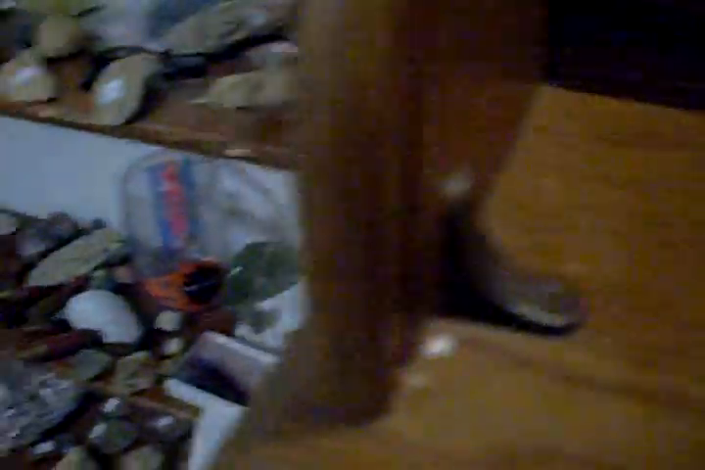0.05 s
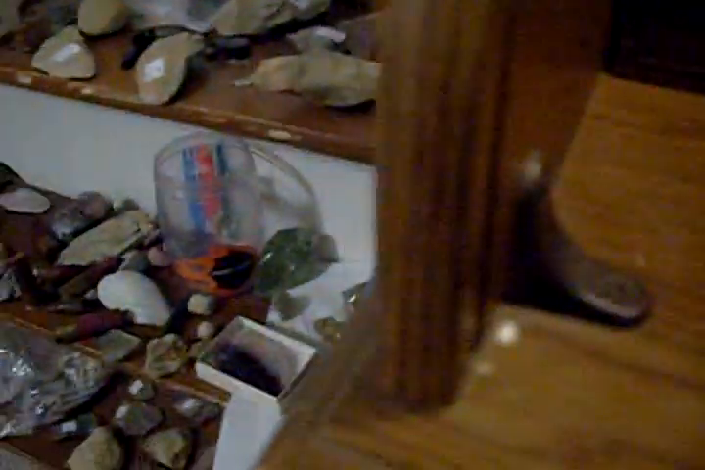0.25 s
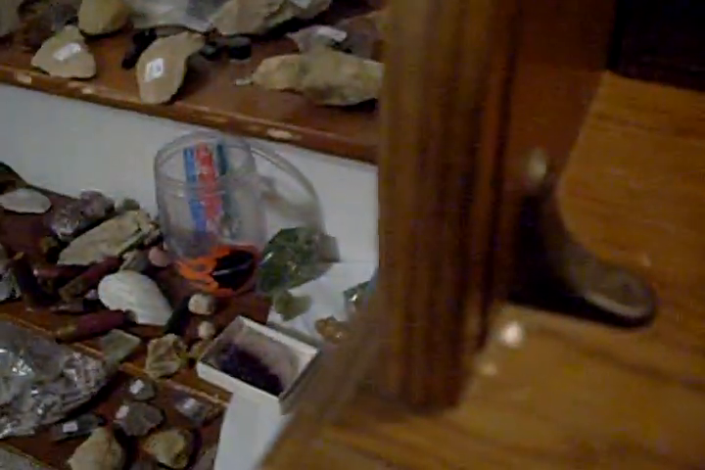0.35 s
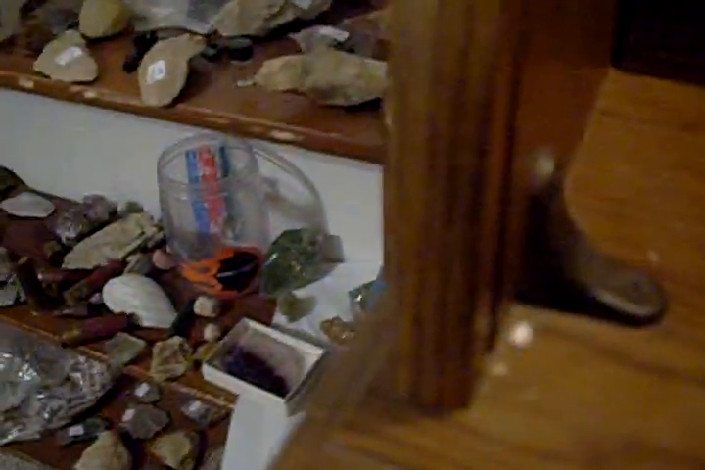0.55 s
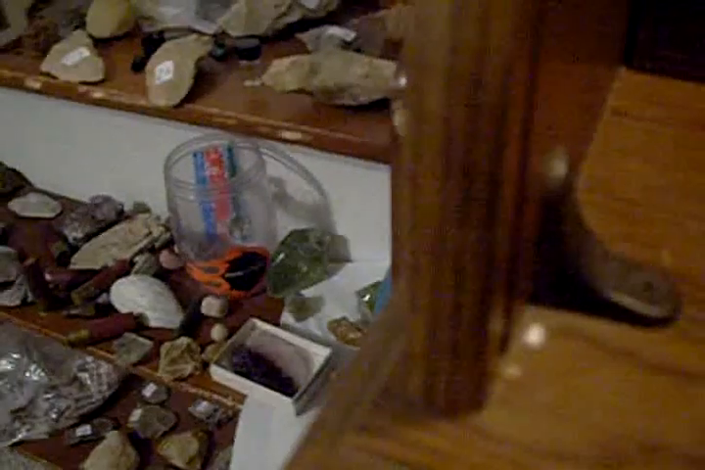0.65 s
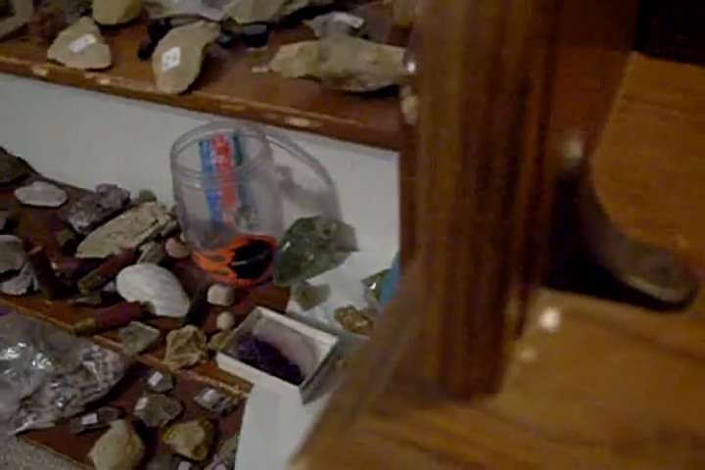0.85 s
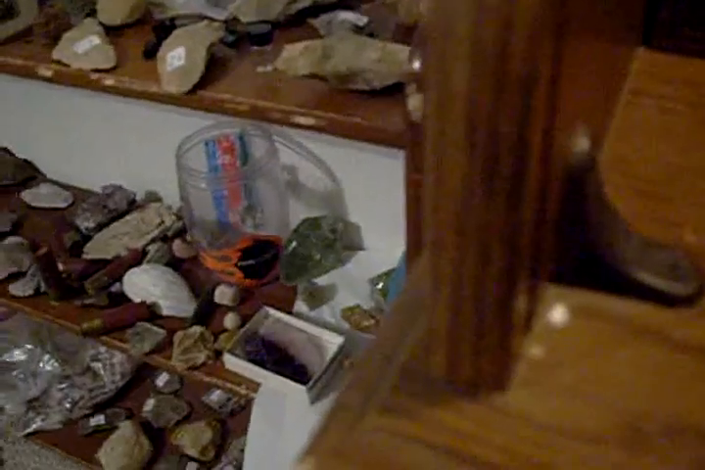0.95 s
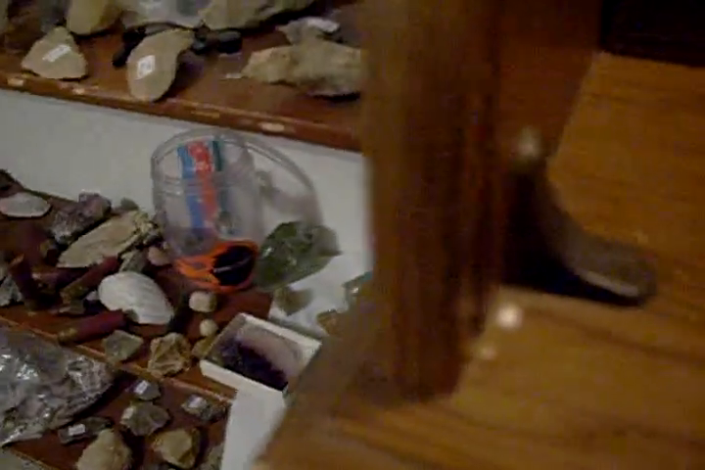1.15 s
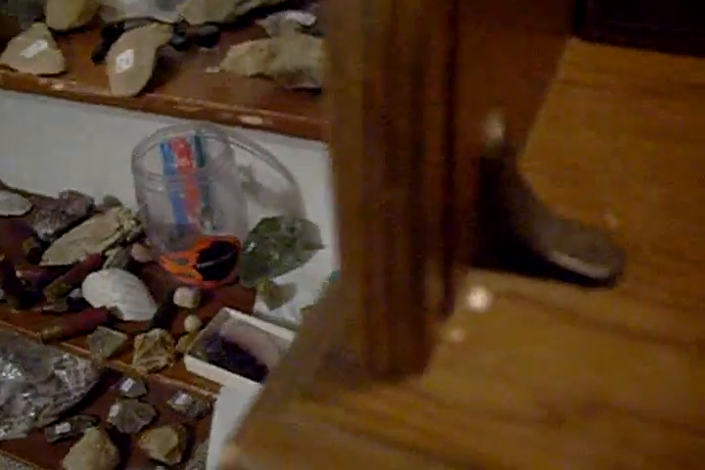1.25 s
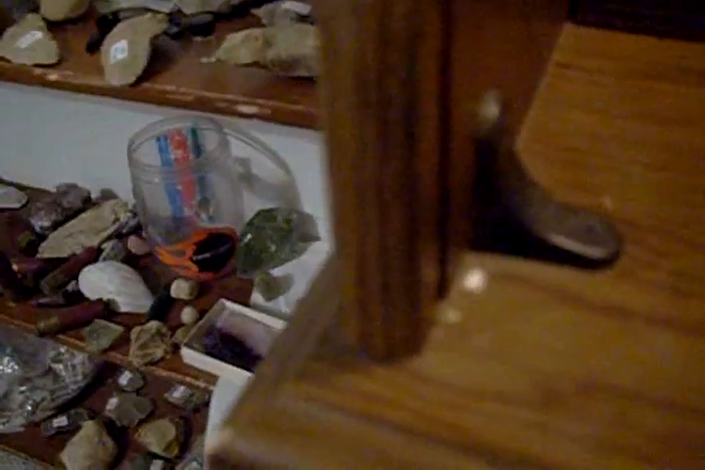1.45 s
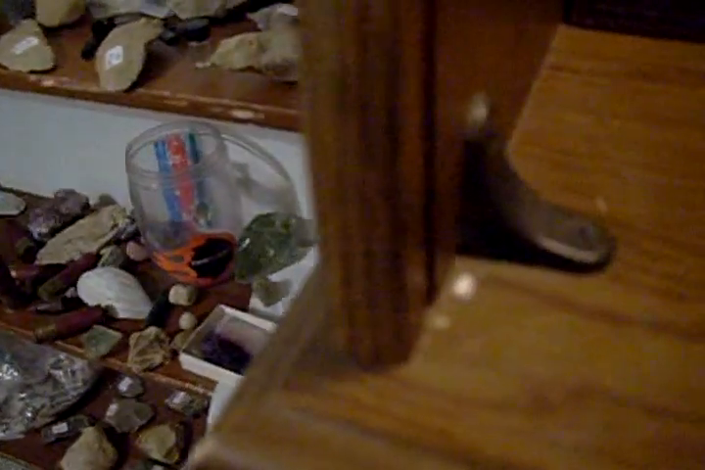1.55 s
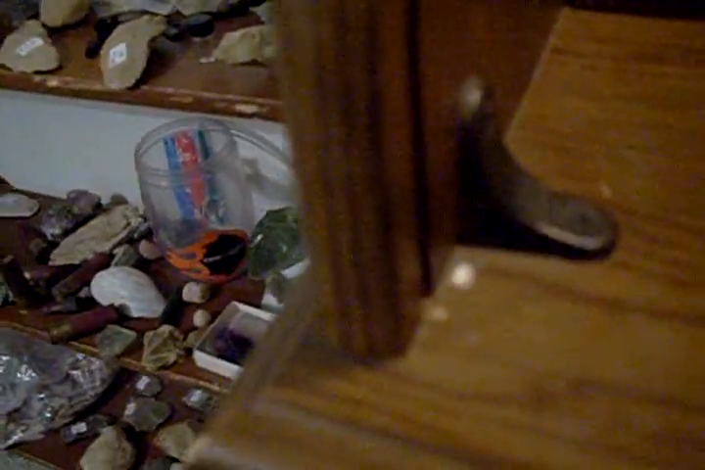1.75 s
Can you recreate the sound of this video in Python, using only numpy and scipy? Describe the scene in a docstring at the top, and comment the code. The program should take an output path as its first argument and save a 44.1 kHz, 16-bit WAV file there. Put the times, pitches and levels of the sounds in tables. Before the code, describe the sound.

Wooden cabinet door moves with squeaks and clacks of metal hardware, then knocks its frame.

```python
"""Metal hardware squeaks, scrapes and clacks as the wooden door of a cabinet full of stones is moved.
Rubbing makes the metal ring in short squeaks, then it slips in single clacks. The door knocks against
its wooden frame, the catch snaps, and small hard pieces chatter and tick. Each hit is a short crack
plus a few fading tones. It all happens close by, in a quiet room."""
import sys
import numpy as np
from scipy import signal
from scipy.fft import rfft, irfft
from scipy.io import wavfile

SR = 44100
rng = np.random.default_rng(int(sys.argv[2]) if len(sys.argv) > 2 else 0)


def persist_wave(psi):
    """Save psi, clipped to +-1, as 16-bit WAV."""
    counts = np.round(np.clip(psi, -1, 1) * 32767).astype(np.int16)
    wavfile.write(sys.argv[1], SR, np.atleast_2d(counts).T)


N = 79380
TIME = np.arange(N) / SR
# tone colour of hard pieces hitting each other: f/Hz, level/dB
HARD_CRACK = [(90, -50), (370, -3.5), (900, -10.5), (1700, 0), (3700, 1.5), (5700, -11), (9000, -10),
              (12000, -32)]


def squeaks():
    """Rubbing drives one tone of the metal per squeak, unevenly; it rings out when the grip lets go."""
    grips = [(.211, 0.0032, 7460, -36), (.2244, 0.0067, 7566, -35), (.293, 0.005, 7490, -41),
             (.322, 0.032, 7520, -36), (.3245, 0.036, 8030, -29), (0.3833, 0.024, 7530, -35),
             (.416, 0.013, 8070, -30.5), (0.442, .09, 4550, -50.5), (0.4503, .036, 8020, -42),
             (.467, 0.0051, 3820, -41), (0.972, 0.0084, 3890, -46), (.983, 0.026, 3902, -41.5)]  # the metal catches: t/s, time driven/s, f/Hz, level/dB
    rise_s, t60_s, sag_db_per_s = 0.0013, 0.047, 133
    wander_hz, roughness, grit = 10.8, 0.22, 0.113
    out = np.zeros(N)
    for start, length, hz, db in grips:
        t = np.maximum(TIME - start, 0)
        driven = np.minimum(t / rise_s, 1) * undb(db - sag_db_per_s * np.minimum(t, length))
        loudness = driven * fade(np.maximum(t - length, 0), t60_s)
        phase = 2 * np.pi * np.cumsum(hz + wander_hz * wobble(150)) / SR
        tone = (1 + roughness * wobble(350)) * np.sin(phase)
        rattle = grit * wobble(600) * np.cos(phase)
        out += loudness * np.sqrt(2) * (tone + rattle)
    return room(out, wet_db=-7)


def scrape():
    """Tiny slips come in clumps, grate, set the metal fittings ringing and shake the door."""
    rubbing = [(.200, -70, -91), (.209, -49.5, -57), (.228, -43.5, -48.5), (.252, -47.5, -53.5),
               (.316, -49.5, -63), (.328, -37.5, -36.5), (.378, -45, -51.5), (.44, -43, -54),
               (.458, -40, -44.5), (.525, -53.5, -71.5), (.765, -56.5, -70), (.800, -78.5, -86),
               (.945, -63, -78), (.995, -48, -56), (1.05, -94, -100)]  # how hard the metal rubs: t/s, level/dB, treble level/dB
    scuffs = [(1.585, 0.014, -61.5), (1.7823, 0.0051, -52.5)]  # brief extra rubs: middle t/s, half length/s, level/dB
    body_colour = [(60, -31), (370, -4.5), (560, -12.5), (1000, -4.5), (1520, 2), (1900, 5), (2350, -7.5),
                   (3100, -2.5), (4500, -4), (6500, -33)]  # main part of the grating: f/Hz, level/dB
    treble_colour = [(3500, -35), (7000, 0.5), (10200, -7), (12400, -27)]  # its high hiss: f/Hz, level/dB
    fitting_tones = [(945, -1.5), (3268, -2), (3850, -2.5), (9950, -1.5)]  # ringing of the fittings: f/Hz, level/dB
    slips_per_s, spread_db, ring_t60_s = 2000, 3, 0.107
    slips = (rng.random(N) < slips_per_s / SR) * rng.choice([-1, 1], N)
    slips = slips * undb(spread_db * rng.standard_normal(N))
    slips *= undb(wobble(130))  # clumps about 1 dB louder or softer
    force, bite = undb(curve(rubbing)), undb(curve(rubbing, column=2))
    force += sum(undb(db) * np.exp(-((TIME - middle) / half) ** 2) for middle, half, db in scuffs)
    grating = unit(colour(slips, body_colour)) * force + unit(colour(slips, treble_colour)) * bite
    ring = np.zeros(N)
    for hz, db in fitting_tones:
        ping = fade(TIME, ring_t60_s) * np.sin(2 * np.pi * hz * TIME)
        ring += undb(db) * unit(signal.fftconvolve(grating, ping)[:N])
    ring = undb(-10) * np.std(grating) * unit(ring)  # 10 dB below the grating
    rumble = undb(-28.5) * wobble(120) * (force + bite)
    return room(grating + ring, wet_db=-11) + rumble


def clacks():
    """The metal hardware slips in single jumps and rings briefly after each."""
    hits = [(.2628, -38.5, -5.5), (.381, -36, 7.5), (.429, -35.5, 6), (.4355, -35, 5.5), (.5432, -31, 1),
            (.5908, -37, -0.5), (.6265, -42, -0.5), (.641, -48.5, -4), (.6533, -48.5, 0),
            (.665, -48.5, -4.5), (.7435, -57.5, 3.5), (.7715, -50.5, 6), (.835, -58.5, -3.5)]  # slips: t/s, level/dB, brightness/dB per octave
    tones = [(1576, -10.5, 0.027), (1972, -6, 0.022), (2870, 0, 0.0089), (3218, -4, 0.012)]  # ringing of the hardware: f/Hz, level/dB, fade time/s
    return blows(hits, tones, HARD_CRACK, crack_db=-4.5)


def knocks():
    """The door knocks against its frame, and the wood rings."""
    hits = [(.004, -51.5, -2.5), (1.034, -44.5, 1), (1.1462, -50.5, -2.5), (1.2215, -39, 5.5),
            (1.2265, -41, -1.5), (1.2342, -38, 5.5), (1.2475, -46.5, -1.5)]  # knocks: t/s, level/dB, brightness/dB per octave
    tones = [(311.3, -12, 0.12), (403, -5.5, 0.098), (566, -8, 0.075), (912, -5, 0.049),
             (1544, -1.5, 0.054)]  # ringing of the wood: f/Hz, level/dB, fade time/s
    wood_crack = [(60, -18), (300, -3), (1900, 10), (4600, -2), (6000, -10), (12000, -28)]  # tone colour of wood hitting wood: f/Hz, level/dB
    return blows(hits, tones, wood_crack, crack_db=3.5, rise_s=0.00044, crack_t60=0.033, detune=0.037)


def snap():
    """The catch snaps as the door meets the frame."""
    hits = [(1.1975, -37, -2)]  # one snap: t/s, level/dB, brightness/dB per octave
    tones = [(3370, -3, 0.013), (3950, -6.5, 0.014), (4670, -3.5, 0.011)]  # ringing of the catch: f/Hz, level/dB, fade time/s
    return blows(hits, tones, HARD_CRACK, crack_db=1)


def chatter():
    """A small piece chatters to rest, each hit softer and duller."""
    hits = [(.9055, -38, 1), (.925, -39, -1.5), (.9425, -46, -5.5)]  # bounces: t/s, level/dB, brightness/dB per octave
    tones = [(2048, -0.5, 0.016), (2800, -11, 0.016)]  # ringing of the piece: f/Hz, level/dB, fade time/s
    return blows(hits, tones, HARD_CRACK, crack_db=-8)


def ticks():
    """Small hard pieces touch lightly and give bright ticks."""
    touches = [(0.1008, -60.5), (1.481, -52), (1.495, -46), (1.5351, -49)]  # light hits: t/s, level/dB
    tones = [(1630, -19.5, 0.041), (4020, -9.5, 0.01)]  # ringing of the pieces: f/Hz, level/dB, fade time/s
    db_per_octave = 7.5
    hits = [(start, db, db_per_octave) for start, db in touches]
    return blows(hits, tones, HARD_CRACK, crack_db=0.5)


def thuds():
    """The wooden panels take up a blow and ring on; the lower the note, the longer."""
    notes = [(.906, 315, -54), (.925, 420, -48), (1.033, 130, -61), (1.147, 352, -53), (1.241, 168, -58.5),
             (1.622, 277, -59.5)]  # the note a blow wakes most, set by where it lands: t/s, f/Hz, level/dB
    rise_s, ring_cycles = 0.0098, 44
    out = np.zeros(N)
    for start, hz, db in notes:
        t = np.maximum(TIME - start, 0)
        loudness = undb(db) * np.minimum(t / rise_s, 1) * fade(t, ring_cycles / hz)
        out += loudness * np.sin(2 * np.pi * hz * t)
    return out


def background():
    """Handling the wood makes a soft, low rustle over the hush of the room."""
    handling = [(0, -54.5), (.1, -71.5), (.85, -82), (.93, -68.5), (1.17, -67.5), (1.225, -46.5),
                (1.31, -80), (1.47, -75.5), (1.63, -66), (1.8, -70.5)]  # strength of the rustle: t/s, level/dB
    rustle_colour = [(40, -21.5), (280, 1.5), (620, -9), (1900, -6.5), (12000, -30.5)]  # its tone colour: f/Hz, level/dB
    hush_colour = [(30, -3), (266, -10), (9800, -11.5), (12000, -32.5)]  # f/Hz, level/dB
    uneven_noise = rng.standard_normal(N) * undb(1.58 * wobble(60))
    rustle = unit(colour(uneven_noise, rustle_colour)) * undb(curve(handling))
    hush = undb(-74.5) * unit(colour(rng.standard_normal(N), hush_colour))
    return rustle + hush


def blows(hits, tones, crack_colour, crack_db, rise_s=0.00176, crack_t60=0.02, detune=0.0123):
    """Each hit rings the object's own tones and gives a short crack; its first 8 ms set its level."""
    out, t, head = np.zeros(2 * N), TIME[:SR // 3], SR // 125
    attack = np.minimum(t / rise_s, 1) ** 2
    bass_cut = [(40, -19), (180, -4)]  # f/Hz, level/dB
    for start, db, tilt in hits:
        ring = np.zeros(len(t))
        for hz, tone_db, t60 in tones:
            shift, strength, phase = rng.standard_normal(3)  # no two hits ring alike
            wave = np.sin(2 * np.pi * (hz * (1 + detune * shift) * t + phase))
            ring += undb(tone_db + 2 * strength) * fade(t, t60) * wave
        crack = colour(rng.standard_normal(len(t)) * fade(t, crack_t60) * attack, crack_colour)
        hit = unit(ring * attack, head) + undb(crack_db) * unit(crack, head)
        first = int(start * SR)
        out[first:first + len(t)] += undb(db) * unit(colour(hit, bass_cut, tilt), head)
    return room(out[:N], wet_db=-15)


def room(x, wet_db):
    """Add the short echo of a small room; the bass lasts longer."""
    t = TIME[:SR // 2]
    split_hz, bass_db = 650, 6.5
    low_pass = signal.butter(2, split_hz, fs=SR, output="sos")
    high_pass = signal.butter(1, split_hz, "high", fs=SR, output="sos")
    low = signal.sosfilt(low_pass, rng.standard_normal(len(t))) * fade(t, t60=0.39)
    high = signal.sosfilt(high_pass, rng.standard_normal(len(t))) * fade(t, t60=0.2)
    tail = undb(bass_db) * low + high
    return x + undb(wet_db) * signal.fftconvolve(x, tail / np.linalg.norm(tail))[:N]


def colour(x, points, tilt=0):
    """Shape the tone through (f/Hz, level/dB) points; tilt brightens it, in dB per octave."""
    size = 2 * len(x)
    hz, db = np.array(points).T
    octave = np.log2(np.maximum(np.arange(size // 2 + 1) * SR / size, 1))
    db = np.interp(octave, np.log2(hz), db) + tilt * np.clip(octave, 8, 13)  # tilt spans 256-8192 Hz
    # fold the filter forward in time, so nothing sounds before its cause
    cepstrum = irfft(np.log(undb(db)))
    cepstrum[1:size // 2] *= 2
    cepstrum[size // 2 + 1:] = 0
    return irfft(rfft(x, size) * np.exp(rfft(cepstrum)))[:len(x)]


def undb(db):
    """Turn decibels into a volume factor."""
    return 10 ** (np.asarray(db) / 20)


def unit(x, head=None):
    """Scale to an average strength (rms) of 1, judged on the first `head` samples if given."""
    return x / np.sqrt(np.mean(x[:head] ** 2))


def curve(rows, column=1):
    """One column of a table, joined by straight lines in time."""
    rows = np.array(rows)
    return np.interp(TIME, rows[:, 0], rows[:, column])


def fade(t, t60):
    """Die away by 60 dB in t60 seconds, the fade time."""
    return np.exp(-np.log(1000) * t / t60)


def wobble(hz):
    """A smooth random wiggle of typical size 1, mostly slower than hz."""
    return unit(signal.sosfilt(signal.butter(2, hz, fs=SR, output="sos"), rng.standard_normal(N)))


def scene():
    """Add all the sounds into one channel."""
    hits = clacks() + chatter() + snap() + ticks() + knocks() + thuds()
    return (hits + squeaks() + scrape() + background())[None]


def record(dry):
    """Cut off the highest treble."""
    top_hz = 12000
    return signal.sosfilt(signal.ellip(10, .2, 80, top_hz, fs=SR, output="sos"), dry)


dry = scene()
out = record(dry)
persist_wave(out)
```